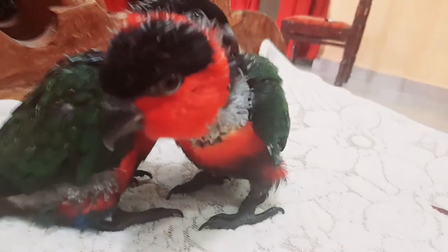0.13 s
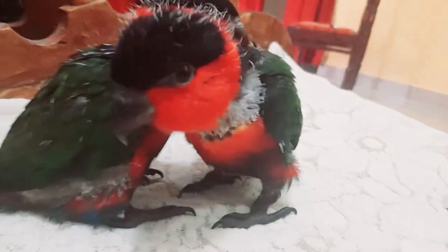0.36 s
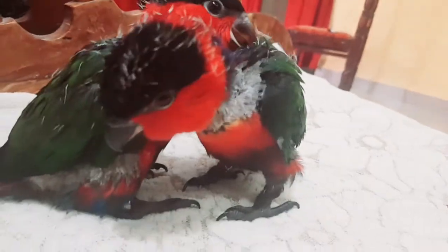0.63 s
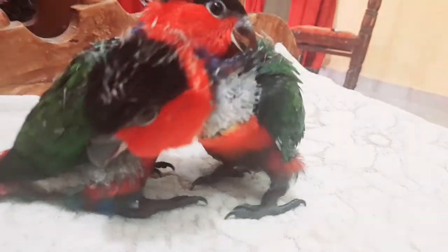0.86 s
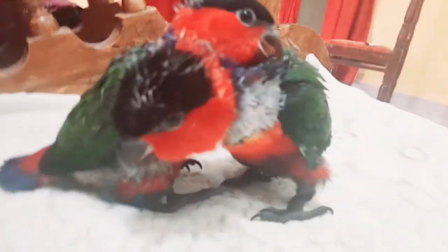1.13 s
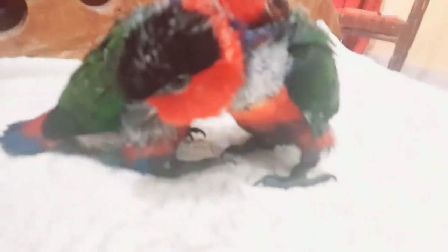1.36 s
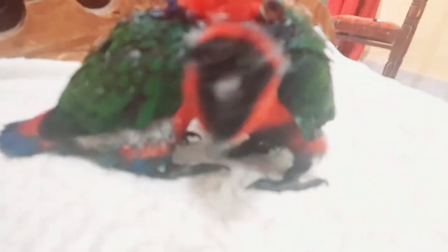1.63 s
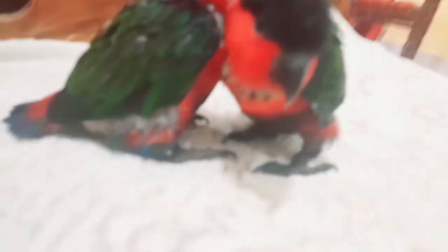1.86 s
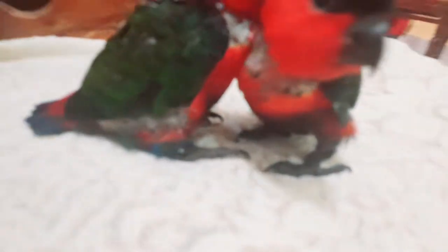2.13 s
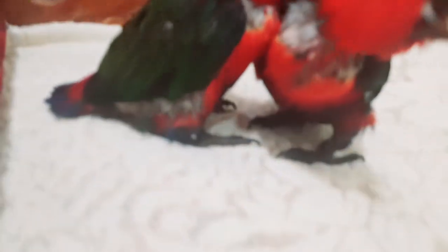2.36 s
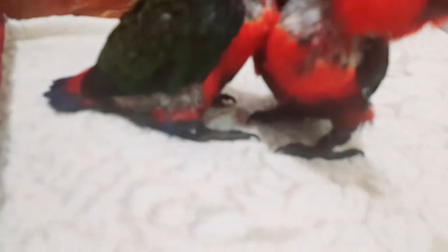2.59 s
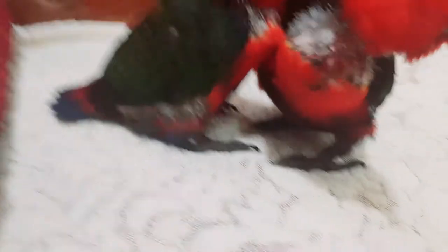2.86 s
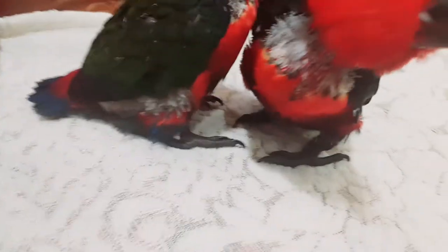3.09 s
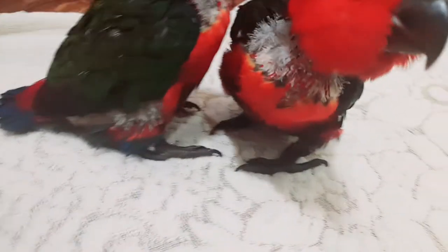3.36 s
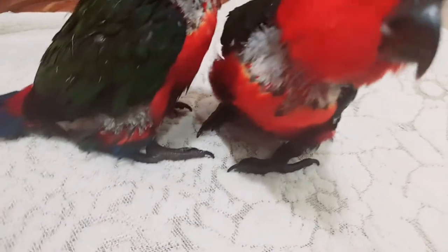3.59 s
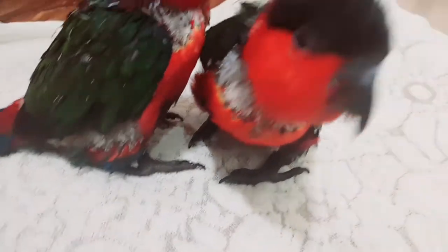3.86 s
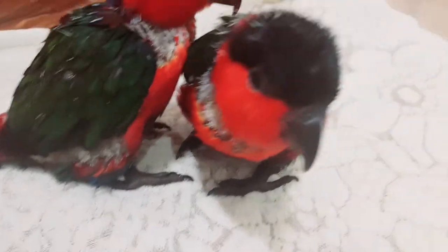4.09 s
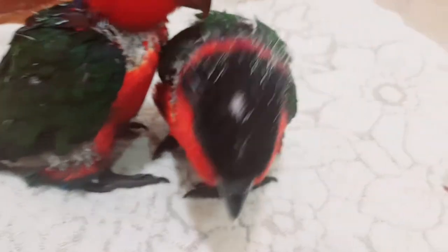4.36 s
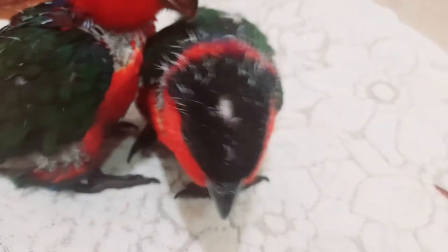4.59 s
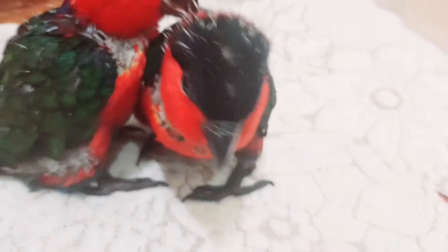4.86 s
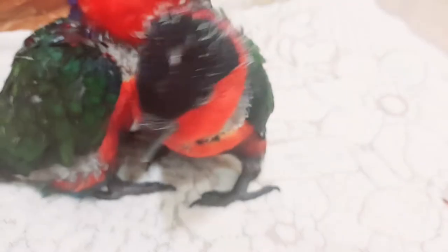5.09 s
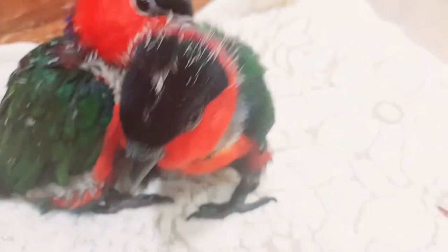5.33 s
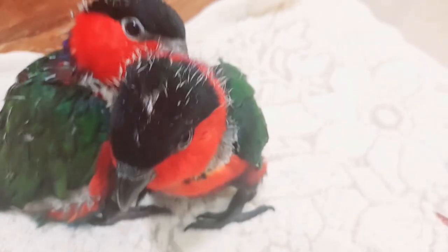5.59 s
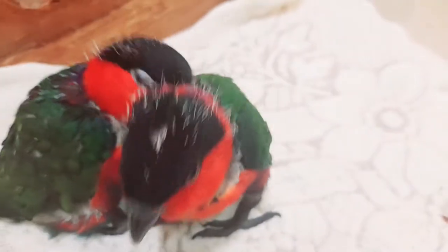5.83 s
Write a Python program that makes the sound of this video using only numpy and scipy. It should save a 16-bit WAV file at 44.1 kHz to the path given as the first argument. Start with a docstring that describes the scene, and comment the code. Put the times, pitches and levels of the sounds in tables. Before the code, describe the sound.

Stereo, close to young parrots on a cloth indoors, with short soft wall echo and a low rumbling wash of street air throughout. A faint distant wheeze fades at the start. At about 0.6 s a throat cluck and tiny squeak open into a loud, hoarse, screechy rasp, strongest at once and weakening until 1.1 s, ending in a cluck. Softer wheezes from other chicks come at 1.6-1.9 s. At 2.15 s a second loud rasp erupts, leaning right, with puffs of air on the right, staying harsh until 2.8 s. Feathers brush and claws tick around 2.8-3.3 s, with soft low foot thuds at 3.0 and 3.3 s. A very quiet, breathy rasp runs 3.7-4.2 s. Brushing continues lightly; an engine revs low outside at 4.0 s and more clearly from 4.8 s. A moderate wavering hoarse call lasts 4.85-5.5 s, with a firmer thud at 5.3 s, then faint rustling and a small thump.

```python
"""Parrot chicks on a cloth rasp hoarsely close to two microphones: rushing air rings the windpipe's
resonances, which partly whistle. Throats squeak and cluck as they open or shut, and walls echo softly.
Other chicks wheeze further off, made from the same kind of ringing noise. Feet thud as short damped rings;
feathers and claws brush and tick on the cloth as shaped noise.
An engine revs outside as a gliding tone over noisy street air; the microphones distort at the loudest."""
import sys
import numpy as np
from scipy import signal
from scipy.fft import rfft, irfft, next_fast_len
from scipy.io import wavfile
from scipy.ndimage import uniform_filter1d, minimum_filter1d, map_coordinates

SR = 44100
rng = np.random.default_rng(int(sys.argv[2]) if len(sys.argv) > 2 else 0)


def how_loud(loudness_db):
    """Turn decibels into a plain amplitude multiplier (0 dB gives 1, 20 dB gives 10)."""
    steps = np.asarray(loudness_db, float) / 20
    return 10 ** steps


def digitize_waveform(pressure):
    """Quantize a signal to 16-bit integers and store it at the path in sys.argv[1].

    Rows of a 2-D input are taken as channels; values are limited to [-1, 1].
    """
    field = np.atleast_2d(pressure).T
    bounded = np.clip(field, -1, 1)
    quanta = np.round(bounded * 32767).astype(np.int16)
    wavfile.write(sys.argv[1], SR, quanta)


N = 262836  # length in samples

# balance of distant sounds at the microphones: f/Hz, left minus right/dB
FAR_BALANCE = [(100, -1), (700, -2), (1500, -3), (2400, -12.5), (3200, -2.5), (5500, -8.5), (6900, -3),
               (7900, 2.5), (12000, 0.5)]


def unit(x):
    """Scale a sound to rms 1."""
    return x / np.sqrt(np.mean(np.abs(x) ** 2) + 1e-20)


def along(points, hz):
    """Read a curve of (f/Hz, value) points, joined by straight lines on a log frequency axis."""
    f, v = np.transpose(points)
    return np.interp(np.log(hz + 1), np.log(f + 1), v)


def add(into, start, x):
    """Mix x in from a sample on, with 4 ms soft ends."""
    n = min(x.shape[-1], N - start)
    edge = np.minimum(np.arange(n), np.arange(n)[::-1]) / (.004 * SR)
    into[..., start:start + n] += x[..., :n] * np.minimum(edge, 1)


def wobble(rate, size):
    """A smooth random curve through `rate` random knots a second."""
    knots = rng.standard_normal(int(size * rate / SR) + 4)
    return map_coordinates(knots, [np.arange(size) * rate / SR])


def filtered(x, response):
    """Shape the spectrum of x by a response, given as a function of frequency."""
    m = next_fast_len(x.shape[-1] + 4096)
    spectrum = rfft(x, m) * response(np.fft.rfftfreq(m, 1 / SR))
    return irfft(spectrum, m)[..., :x.shape[-1]]


def colored_noise(curve):
    """Two unrelated noises, left and right, whose spectrum follows a (f/Hz, dB per Hz) curve."""
    return filtered(rng.standard_normal((2, N)), lambda hz: how_loud(along(curve, hz)))


def placed(pair, alike, heading, lead_ms):
    """Turn two unrelated sounds into left and right of given likeness, balance and lag; their mean has rms 1."""
    def turn(hz):
        return np.arccos(np.clip(along(alike, hz), 0, 1)) / 2

    mid, side = filtered(pair, lambda hz: np.array([np.cos(turn(hz)), np.sin(turn(hz))]))
    half = np.array([[.5], [-.5]])  # left gets half of balance and lead, right the opposite half

    def balance_and_lead(hz):
        return how_loud(half * along(heading, hz)) * np.exp(2j * np.pi * half * hz * lead_ms / 1000)

    ears = filtered(np.array([mid + side, mid - side]), balance_and_lead)
    return ears / np.sqrt(np.mean(ears.mean(0) ** 2))


def swell(s, rise_s, hold_s, fade_db_per_s, length_s=None):
    """First sample and dB shape of an event: up from 20 dB below, held, then fading 30 dB or until it stops."""
    t = np.arange(round((length_s or rise_s + hold_s + 30 / fade_db_per_s) * SR)) / SR
    t = t[(s + t >= 0) & (s + t < N / SR)]
    rise_db = -20 * np.clip(1 - t / rise_s, 0, 1)
    fade_db = fade_db_per_s * np.maximum(t - rise_s - hold_s, 0)
    return round((s + t[0]) * SR), rise_db - fade_db


def resonance(hz, width_hz, whistle, waver):
    """Turbulence ringing a resonance of moving pitch; part of its power locks into a whistle."""
    off = np.fft.fftfreq(next_fast_len(len(hz)), 1 / SR)
    white = rng.standard_normal((2, len(off))) + 1j * rng.standard_normal((2, len(off)))
    # steep skirts leave dark valleys between resonances
    ringing = unit(np.fft.ifft(white / (1 + 1.4j * off / width_hz) ** 3)[:, :len(hz)])
    turn = 2 * np.pi * np.cumsum(hz) / SR
    share = np.clip(whistle, 0, 1)
    breath = (ringing * np.exp(1j * turn)).real  # the noise moved up to the wanted pitch
    tone = np.cos(turn + width_hz * waver)
    return np.sqrt(1 - share) * breath + np.sqrt(share) * tone


def band(modes, stretch):
    """Neighbouring resonances sliding together; a wider one holds more power at the same height."""
    shake = np.array([wobble(200, size=len(stretch)), wobble(200, size=len(stretch))])
    waver = 2 * np.pi * np.cumsum(.3 * shake, axis=1) / SR
    total = 0
    for hz, width, db, whistle in modes:
        total = total + how_loud(db) * np.sqrt(width) * resonance(hz * stretch, width, whistle, waver)
    return total


def knocks(events, cycles):
    """Short damped rings whose strength peaks after the given number of cycles and then dies away."""
    out, t = np.zeros(N), np.arange(SR // 8) / SR
    for s, db, hz in events:
        u = t * hz / cycles
        envelope = np.e * u * np.exp(-u)
        add(out, round((s - .004) * SR), how_loud(db) * envelope * np.sin(2 * np.pi * hz * t))
    return out


def room_air():
    """Street noise through the walls: a lumpy rumble under a smooth wash. Beneath it lies a faint steady hiss
    of the microphones themselves."""
    # street noise over time: t/s, wash level/dB, rumble level/dB
    street_levels = [(0, -47, -50), (.5, -46, -46), (.81, -45.5, -45.5), (1.11, -46, -43.5),
                     (1.33, -48, -44.5), (1.91, -46.5, -51.5), (2.19, -48, -49), (2.62, -58, -54),
                     (2.95, -51, -52), (3.62, -55.5, -55.5), (3.97, -50.5, -51), (4.52, -47.5, -50.5),
                     (4.8, -43.5, -41), (5.14, -42.5, -44), (5.51, -42.5, -44.5), (5.84, -44, -43.5),
                     (5.96, -42.5, -46)]
    # colours of wash, rumble and hiss, each: f/Hz, relative level/dB per Hz
    wash_color = [(90, -22.5), (125, -3.5), (200, -7), (370, -5.5), (520, -15.5), (1200, -15),
                  (2500, -22.5), (3000, -30), (4500, -33.5), (6600, -38), (7600, -46), (9000, -49.5),
                  (12500, -43), (15700, -49.5)]
    rumble_color = [(13, -55), (22, -24), (47, -7.5), (65, -2), (81, -2.5), (140, -13.5), (180, -38.5),
                    (310, -120)]
    hiss_color = [(2000, -21), (3000, 5), (6500, 0.5), (7600, -15.5), (12500, -12), (15700, -10.5)]
    # how alike the wash is left and right: f/Hz, likeness 0-1
    wash_alike = [(100, 0.91), (400, 0.88), (1000, 0.058), (2000, 0.54), (15000, 0.11)]

    s, *tracks = np.transpose(street_levels)
    wash_db, rumble_db = (np.interp(np.arange(N) / SR, s, db) for db in tracks)
    wash_db = wash_db + .8 * wobble(5, size=N)
    rumble_db = rumble_db + 2.5 * wobble(5.5, size=N)
    wash = placed(colored_noise(wash_color), wash_alike, FAR_BALANCE, -0.17)
    hiss = placed(colored_noise(hiss_color), [(1000, 0.0024)], FAR_BALANCE, 0)
    rumble = placed(colored_noise(rumble_color), [(30, 0.74), (90, 0.86)], [(30, -6.5), (90, -2.5)], 0)
    return how_loud(wash_db) * wash + how_loud(-72.5) * hiss + how_loud(rumble_db) * rumble


def engine():
    """Only the firing tone and a little of its octave get through the walls."""
    # each rev: start t/s, length/s, top level/dB (rms), firing f/Hz at its start, at its end
    engine_revs = [(3.96, .26, -38, 81.5, 92.6), (4.775, .36, -33, 80.5, 111),
                   (5.201, 0.437, -41, 108.1, 84), (5.6, .36, -37, 82.8, 74.5)]
    out = np.zeros(N)
    for s, length_s, db, from_hz, to_hz in engine_revs:
        start, shape_db = swell(s, rise_s=0.073, hold_s=0, fade_db_per_s=35, length_s=length_s)
        turn = 2 * np.pi * np.cumsum(np.linspace(from_hz, to_hz, len(shape_db))) / SR
        tone = np.sin(turn) + 0.089 * np.sin(2 * turn)
        add(out, start, np.sqrt(2) * how_loud(db + shape_db + wobble(13, size=len(turn))) * tone)
    return out


def far_chicks():
    """Ringing throat noise that arrives mostly off the walls, unlike at the two microphones."""
    # each wheeze: start t/s, hold/s, upper band level/dB, lower band against it/dB, fade/dB per s
    far_wheezes = [(-.04, 0.21, -55.5, -2.5, 130), (1.569, 0.03, -56, 0.5, 299),
                   (1.64, 0.069, -48, -2.5, 128.5), (1.823, .02, -53, -6, 50)]
    # the throat of each wheeze, lower band first: f/Hz, width/Hz, height within its band/dB, whistle share 0-1
    far_pipes = [
        [(2970, 890, 0, 0.2), (4660, 120, 2, 0.4), (5260, 120, 0.5, 0.4), (6310, 500, 7, 0.17),
         (5500, 2300, -13.5, 0.1), (9400, 400, -12.5, 0.1), (10740, 900, -16, 0), (13500, 3000, -22.5, 0.03)],
        [(2190, 95, 0, 0.6), (4370, 104, 0, .4), (6400, 120, 1, 0.7), (8600, 170, -15.5, 0.36)],
        [(2720, 520, 0, 0.2), (4060, 380, 0, 0.3), (5040, 800, 2, 0), (6160, 1100, -5, 0.1),
         (7200, 640, -8.5, 0.07), (10680, 3300, -14.5, 0.13)],
        [(3000, 780, 0, 0), (4470, 1700, 0.5, 0), (6400, 540, 3.5, 0.05), (7180, 280, -12, 0),
         (10500, 2700, -12.5, 0.1)],
    ]
    out = np.zeros((2, N))
    for (s, hold_s, db, low_db, fade), throat in zip(far_wheezes, far_pipes):
        start, shape_db = swell(s, 0.06, hold_s, fade)
        for rel_db, modes in ((low_db, throat[:1]), (0, throat[1:])):
            ears = placed(band(modes, np.ones(len(shape_db))), [(1000, .15)], FAR_BALANCE, 0)
            add(out, start, how_loud(db + rel_db + shape_db) * ears)
    return out


def cloth():
    """Feathers brush the fabric with thin high noise; claws snag it with broad short ticks."""
    # feathers brushing: start t/s, hold/s, level/dB
    feather_brushes = [(2.79, .04, -71.5), (2.94, 0.17, -67), (3.565, .02, -77.5), (4.385, .005, -76.5),
                       (4.43, .01, -72), (4.49, .07, -71.5), (4.6, .19, -81.5), (5.5, .02, -73),
                       (5.6, .23, -76), (5.87, .08, -81.5)]
    # colour of the brushing: f/Hz, relative level/dB per Hz
    feather_color = [(4120, -1.5), (7000, 1.5), (7690, -14), (8090, -24), (11700, 0.5), (14400, 0.5),
                     (15600, -8)]
    # claws catching on threads: t/s, starting level/dB
    claw_snags = [(2.9535, -51), (2.9784, -56), (3.0026, -55), (3.3342, -62.5), (5.6585, -55)]

    brush, snag, t = np.zeros(N), np.zeros(N), np.arange(SR // 20) / SR
    for s, hold_s, db in feather_brushes:
        start, shape_db = swell(s, .012, hold_s, 220.5)
        add(brush, start, how_loud(db + shape_db + 1.52 * wobble(60, size=len(shape_db))))
    for s, db in claw_snags:
        add(snag, round((s - .003) * SR), how_loud(db - 60 * t / 0.0358))  # 60 dB down in 0.0358 s
    tick = filtered(rng.standard_normal((2, N)), lambda hz: hz / (hz + 2500))
    brushing = brush * placed(colored_noise(feather_color), [(1000, 0.1)], [(1000, -9.5)], 0)
    return brushing + snag * placed(tick, [(1000, .3)], [(1000, -8.0)], 0)


def footsteps():
    """Feet landing on the cloth thud as strongly damped low rings."""
    # each landing: t/s, peak level/dB, f/Hz
    foot_landings = [(3.003, -31.5, 74), (3.34, -38.5, 80.7), (5.294, -21, 204), (5.668, -36, 137)]
    return knocks(foot_landings, cycles=0.56)


def puff():
    """The nearest call blows on the right microphone alone: low lumpy buffeting."""
    # each puff: start t/s, hold/s, level/dB
    breath_puffs = [(2.164, 0.032, -28.5), (2.271, 0.13, -39), (2.549, 0.018, -41.5)]
    out = np.zeros((2, N))
    for s, hold_s, db in breath_puffs:
        start, shape_db = swell(s, 0.029, hold_s, 400)
        gust = filtered(rng.standard_normal(len(shape_db)), lambda hz: 1 / (1 + (hz / 450) ** 2))
        add(out[1], start, how_loud(db + shape_db + 2.4 * wobble(69, size=len(gust))) * unit(gust))
    return out


def walls(x):
    """Echo as a noise tail in which each frequency dies at its own speed."""
    # time the echo takes to fall by 60 dB: f/Hz, time/s
    echo_times = [(500, .35), (5000, 0.29), (12000, .15)]
    hz, t, z = signal.stft(rng.standard_normal((2, SR // 2)), SR, nperseg=256)
    fading = z * how_loud(-60 * t / along(echo_times, hz)[:, None])
    tail = signal.istft(fading, SR, nperseg=256)[1]
    late = np.pad(x, (500, 0))[None]  # the echo starts 500 samples after the sound
    return signal.fftconvolve(late, tail / np.linalg.norm(tail[0]), axes=1)[:, :N]


def clucks():
    """The throat clucks as it opens or shuts: a short damped ring."""
    # each cluck: t/s, peak level/dB, f/Hz
    throat_clucks = [(0.573, -40, 602), (1.125, -28, 727), (2.155, -36.5, 575), (2.775, -38.5, 626),
                     (3.719, -38, 736), (4.214, -31.5, 660), (4.839, -23.5, 680), (5.472, -37, 577)]
    return knocks(throat_clucks, cycles=1.2)


def squeaks():
    """The opening throat squeaks: one resonance sweeps up just before a rasp breaks out."""
    # each squeak: start t/s, length/s, level/dB (3 dB above its rms), from f/Hz, to f/Hz
    throat_squeaks = [(.573, .03, -48, 600, 3300), (2.153, 0.029, -38.5, 783, 3000),
                      (3.716, .03, -40.5, 2304, 2426)]
    out = np.zeros((2, N))
    for s, length_s, db, from_hz, to_hz in throat_squeaks:
        hz = np.linspace(from_hz, to_hz, round(length_s * SR))
        steady = np.zeros((2, len(hz)))  # its whistle does not waver
        add(out, round(s * SR), how_loud(db) * resonance(hz, width_hz=300, whistle=0.29, waver=steady))
    return out


def chicks():
    """Each rasp: groups of resonances that swell with effort; the lower four slide as neck and beak move."""
    # each rasp while the throat is open: t/s, breath effort/dB,
    # neck tuning as third resonance f/Hz (only its ratio to the rasp's median is used)
    rasp_tracks = [
        [(.592, -51.5, 3646), (.601, -40.5, 3903), (.61, -16.5, 4294), (.62, -13, 4226), (.657, -19.5, 4153),
         (.707, -27, 4020), (.855, -25, 3940), (.979, -28, 3883), (1.081, -37.5, 3900), (1.115, -42.5, 3967)],
        [(2.168, -36.5, 3706), (2.182, -12, 4100), (2.222, -15, 3950), (2.278, -14, 3880), (2.456, -15.5, 3790),
         (2.485, -20, 3780), (2.654, -15.5, 3706), (2.745, -21.5, 3626), (2.774, -32, 3392)],
        [(3.727, -52, 3750), (3.742, -45.5, 3750), (3.832, -48.5, 3670), (4.03, -45.5, 3720),
         (4.166, -42.5, 3664), (4.212, -51, 3640)],
        [(4.843, -41, 3940), (4.857, -36.5, 3960), (4.889, -34, 4142), (4.975, -38.5, 3998),
         (5.102, -40.5, 4125), (5.112, -33.5, 4120), (5.185, -32, 4030), (5.251, -42, 3976), (5.285, -42, 3937),
         (5.31, -40, 4110), (5.42, -37, 4030), (5.448, -42, 3880), (5.46, -49, 3685)],
    ]
    # each rasp: first, second, third, upper resonances and hiss, against the top ones at usual effort/dB
    group_levels = [(-13, -12, -7, -19.5, -25.5), (-33, -19, -13.5, -25, -34), (-1.5, 0, -3, -17.5, -29.5),
                    (-3.5, -5, 6.5, -16, -26.5)]
    # windpipe and beak of each rasp: f/Hz, width/Hz, height within its group/dB, whistle share 0-1
    windpipes = [
        [(907, 210, 1.5, 0.22), (1315, 400, -5.5, 0.38), (2420, 690, -3, 0.05), (2973, 150, 1, 0),
         (4040, 640, 0, 0.03), (5544, 590, 9.5, 0), (6150, 1200, -2.5, 0), (7200, 800, -21.5, 0.1),
         (9200, 1000, -31.5, 0), (11790, 4600, -33.5, 0.2), (13100, 1800, -30, 0.1)],
        [(848, 240, 0, 0.3), (1273, 1200, -15.5, 0.06), (2393, 510, -8.5, 0.03), (2973, 390, 1.5, 0),
         (3750, 360, 2, 0), (4460, 760, -11.5, 0.3), (5365, 550, 7.5, 0.4), (6205, 1100, -0.5, 0.16),
         (7510, 650, -22, 0.23), (8620, 600, -25, 0), (11400, 1200, -37, 0.07), (12800, 1900, -37, 0.05)],
        [(840, 210, -1, 0), (1245, 440, -7, 0.1), (2350, 230, 6.5, 0.36), (2760, 980, -4.5, 0),
         (3720, 310, 2, 0.07), (4330, 710, -2, 0.04), (4770, 950, 7, 0.2), (5640, 820, -1, 0),
         (6210, 580, 4, 0.1), (7070, 1100, -6.5, 0.27), (9200, 1400, -16, 0.4), (13000, 4000, -26, 0.09)],
        [(889, 255, -0.5, 0.2), (1335, 410, -1, 0), (2410, 280, 10, 0.04), (2920, 250, -3.5, 0.16),
         (4030, 126, 10, 1), (4450, 417, -4, 0.15), (3800, 660, -6.5, 0.1), (4870, 1300, 1.5, 0.27),
         (5880, 1300, -6, 0.03), (7480, 1400, -6, 0), (10100, 1400, -22, 0), (14000, 2800, -23, 0.01)],
    ]
    # where the head points in each rasp: f/Hz, left minus right/dB
    head_balance = [
        [(700, 4), (1400, 1), (2400, -13.5), (3100, -9.5), (4100, -0.5), (5500, 11.5), (6900, 11), (9500, 15.5),
         (12000, -1), (14000, 2.5)],
        [(700, 2), (1500, -15), (3000, -10.5), (4100, -8), (4900, -17.5), (5500, -26.5), (6300, -18.5),
         (7900, -5.5), (10000, -10.5), (12500, -17.5)],
        [(700, 0.5), (1700, -6), (2400, -8), (3800, -5), (5500, -20), (6900, -2.5), (8500, 3.5), (13000, 1.5)],
        [(700, -1), (1700, -3.5), (2400, -7.5), (4000, -12.5), (4900, -16), (6900, -7.5), (8000, 3.5),
         (13000, -1)],
    ]
    # each rasp: left lead/ms, left-right likeness up to 5 kHz, likeness from 9 kHz
    ear_paths = [(.28, .85, .45), (-.045, .85, .4), (.16, .9, .5), (.2, .9, .45)]
    # how far the first resonance comes and goes, rasp by rasp/dB
    first_sputter = (1.2, 3.4, 0.84, 1.7)
    # fading of the upper resonances as air runs out, rasp by rasp/dB per s (negative: they grow)
    upper_sag = (-7, 12, -2, 5)
    # borders between first, second, third, top, upper resonances and hiss: f/Hz
    group_edges = (1700, 3400, 4600, 6800, 9400)
    # gain of each group per dB of effort, first to hiss: dB per dB
    effort_gain = (.12, 0.47, .85, 0.93, .35, 0.67)
    open_s, shut_s = .02, .025  # the throat opens before and shuts after the held part
    attack_db_per_s, release_db_per_s = 1699, 1198
    upper_burst_s, hiss_burst_s = .08, .14

    out = np.zeros((2, N))
    for rows, voice, throat, heading, path, sputter_db, sag in zip(
            rasp_tracks, group_levels, windpipes, head_balance, ear_paths, first_sputter, upper_sag):
        *levels, upper_db, hiss_db = voice
        lead_ms, low_alike, high_alike = path
        s, effort_db, neck_hz = np.transpose(rows)
        start = round((s[0] - open_s) * SR)
        now = np.arange(start, round((s[-1] + shut_s) * SR)) / SR
        early, late = np.maximum(s[0] - now, 0), np.maximum(now - s[-1], 0)

        held_db, neck = np.interp(now, s, effort_db), np.interp(now, s, neck_hz)
        usual_db = np.median(held_db)
        push_db = held_db - usual_db
        gate_db = -attack_db_per_s * early - release_db_per_s * late
        flutter_db = 1.8 * wobble(45, size=len(now))  # unsteady air pressure

        # the neck tuning trembles; the third resonance drops while the throat is shut
        neck = neck / np.median(neck) + .004 * wobble(50, size=len(now))
        third = neck * (1 - .12 * np.maximum(early / open_s, late / shut_s))
        # the first resonance sinks as the throat narrows at either end and climbs with effort
        narrow = np.clip(1 - np.minimum(now - now[0], now[-1] - now) / .045, 0, 1)
        first = 1 - .25 * narrow + .006 * push_db
        still = np.ones(len(now))  # upper resonances and hiss keep their pitch
        slides = [first, third, third, neck ** 1.3, still, still]

        # upper resonances and hiss start strong and settle
        settled_s = np.maximum(now, s[1]) - s[1]
        upper_db = upper_db + 6 * np.exp(-settled_s / upper_burst_s) - sag * (now - now.mean())
        hiss_db = hiss_db + 12.5 * np.exp(-settled_s / hiss_burst_s)
        rel_db = [db + gate_db for db in (*levels, 0, upper_db, hiss_db)]
        # the first resonance leaks through the shut throat, losing only a share of the gate's dB
        rel_db[0] = levels[0] + .26 * gate_db + sputter_db * wobble(25.9, size=len(now))
        # effort over 2.5 dB above usual no longer lifts the second resonance
        rel_db[1] = rel_db[1] - effort_gain[1] * np.maximum(push_db - 2.5, 0)
        # the third group dips briefly in the last rasp
        rel_db[2] = rel_db[2] - 8 * np.exp(-((now - 4.945) / 0.059) ** 2)

        for k, slide in enumerate(slides):
            modes = [m for m in throat if np.searchsorted(group_edges, m[0]) == k]
            ears = placed(band(modes, slide), [(5000, low_alike), (9000, high_alike)], heading, lead_ms)
            group_db = usual_db + rel_db[k] + effort_gain[k] * push_db + flutter_db
            add(out, start, how_loud(group_db) * ears)
    return out


def scene():
    """Near chicks and their echo over everything further away."""
    near = chicks() + squeaks() + clucks()
    echo = how_loud(-22.0) * walls(near.mean(0))
    lows = (footsteps() + engine()) * how_loud([[-.8], [.8]])  # a little louder on the right
    return near + echo + puff() + far_chicks() + cloth() + lows + room_air()


def top_cut(x):
    """Nothing passes above the cut-off."""
    return signal.sosfilt(signal.butter(12, 15760, fs=SR, output="sos"), x)


def record(dry):
    """Loud sound bends the microphones unevenly, adding an octave and a low flutter; a limiter holds the peaks."""
    bent = dry + 0.062 * dry ** 2
    needed = np.minimum(1, .88 / (np.abs(bent) + 1e-9))
    held = bent * uniform_filter1d(minimum_filter1d(needed, size=181), size=90)
    # nothing from 15760 Hz up; the bass thins out below about 45 Hz
    cut = filtered(held, lambda hz: (hz < 15760) * (1j * hz / (45 + 1j * hz)) ** 2)
    return top_cut(cut)


dry = scene()
out = record(dry)
digitize_waveform(out)
```